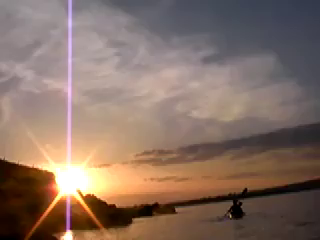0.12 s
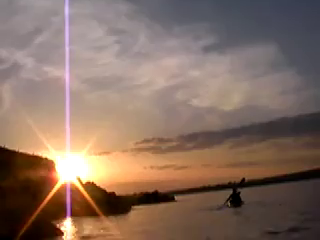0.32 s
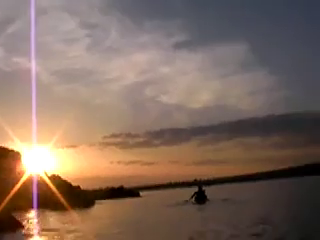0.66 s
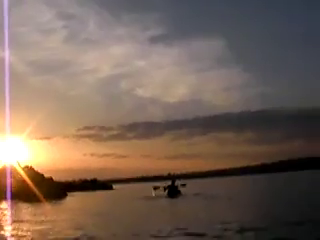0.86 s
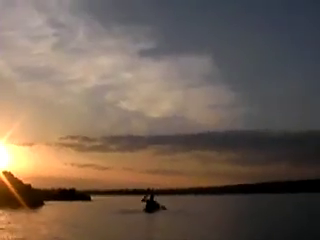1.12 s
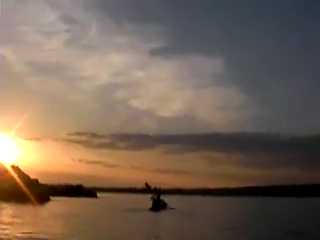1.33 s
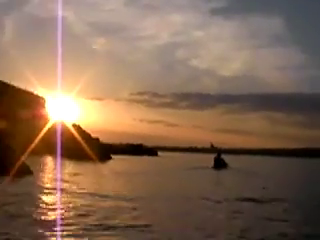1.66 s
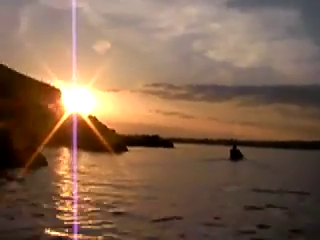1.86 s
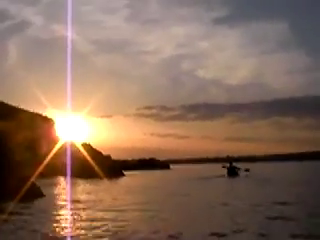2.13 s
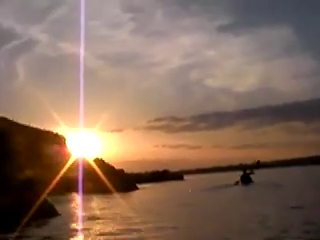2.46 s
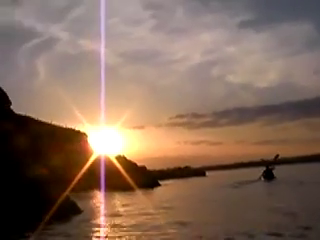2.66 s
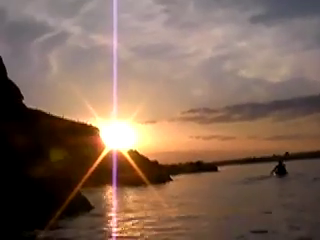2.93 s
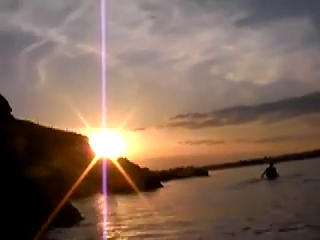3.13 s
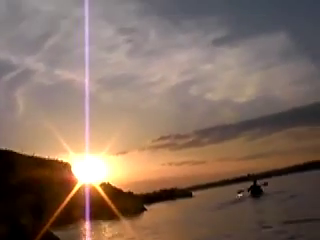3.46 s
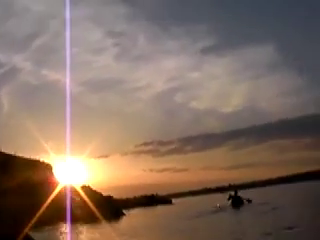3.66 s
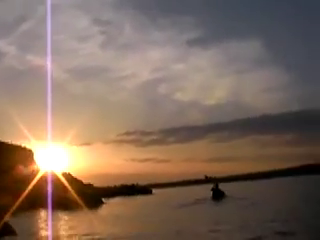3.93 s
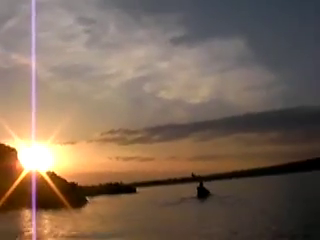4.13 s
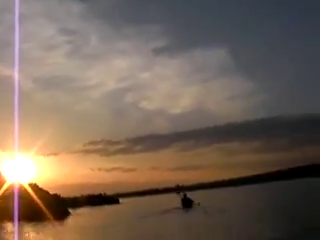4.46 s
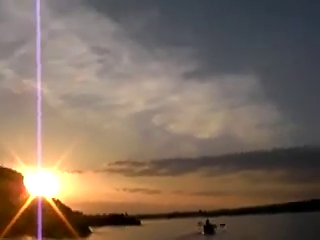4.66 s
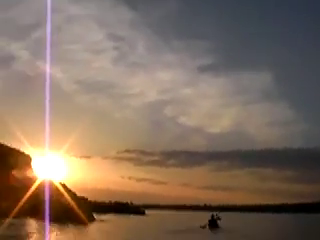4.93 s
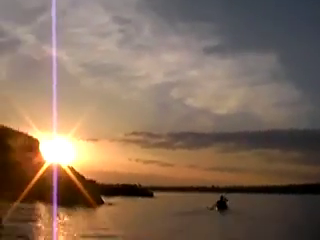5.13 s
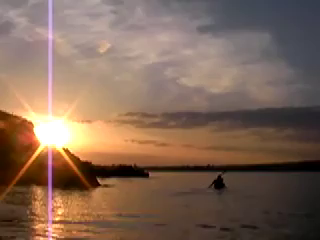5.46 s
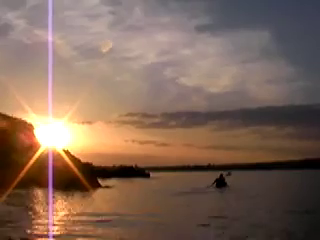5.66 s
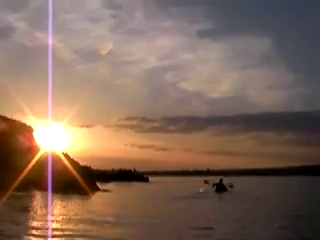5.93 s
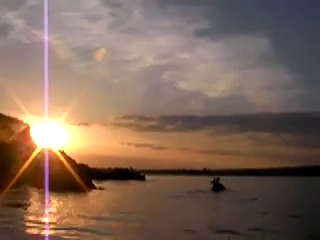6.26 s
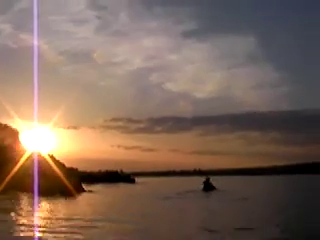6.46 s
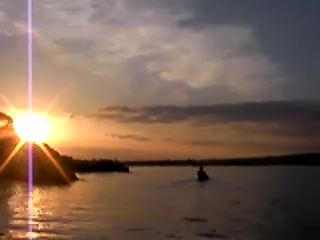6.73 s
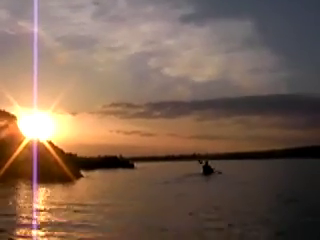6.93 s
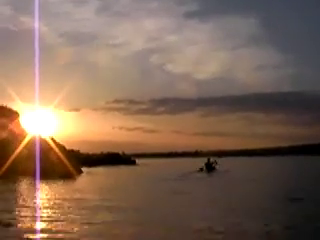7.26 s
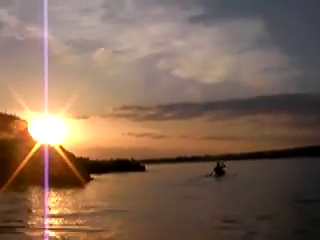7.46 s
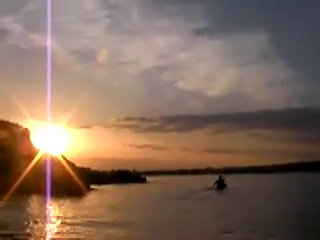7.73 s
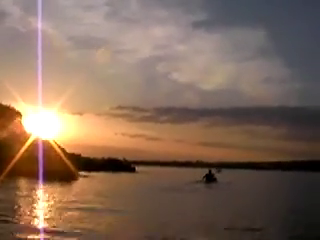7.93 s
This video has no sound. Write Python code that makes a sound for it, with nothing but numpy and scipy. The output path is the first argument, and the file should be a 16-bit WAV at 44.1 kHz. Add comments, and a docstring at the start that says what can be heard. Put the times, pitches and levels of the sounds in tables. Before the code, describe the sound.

Close watery trickle and fizz around a paddled kayak on calm water, small splashes, bright drips, and one hard hollow hull knock near seven seconds.

```python
"""On calm water a kayak glides along, heard from its deck through a small camera with two close microphones.
Paddle strokes stir a wash of filtered noise and gliding bubble tones, and small splashes flare out of it.
Near bubbles and drips are short decaying sines; wavelets lapping at the hull and falling drops are puffs
of noise. Once something hard knocks on the hollow hull, which rings in damped modes, booms and thuds."""
import sys
import numpy as np
from scipy import signal
from scipy.fft import rfft, irfft
from scipy.io import wavfile
from scipy.ndimage import uniform_filter1d

SR = 44100
rng = np.random.default_rng(int(sys.argv[2]) if len(sys.argv) > 2 else 0)


def digitize_waveform(pressure):
    """Quantize a signal to 16-bit integers and store it at the path in sys.argv[1].

    Rows of a 2-D input are taken as channels; values are limited to [-1, 1].
    """
    field = np.atleast_2d(pressure).T
    bounded = np.clip(field, -1, 1)
    quanta = np.round(bounded * 32767).astype(np.int16)
    wavfile.write(sys.argv[1], SR, quanta)


N = 356328
TIME = np.arange(N) / SR


def amp(db):
    """Logarithmic level: converts decibels to an amplitude gain."""
    return 10 ** (np.asarray(db) / 20)


def unit(x):
    """Normalization: scales a signal to rms 1."""
    return x / np.sqrt(np.mean(x ** 2) + 1e-20)


def read(points, hz):
    """Spectral interpolation: reads a table on a log-frequency axis."""
    f, value = np.transpose(points)
    return np.interp(np.log(hz + 1), np.log(f + 1), value)


def add(mix, s, sound):
    """Superposition: mixes a sound in at time s."""
    part = mix[:, max(round(s * SR), 0):][:, :sound.shape[-1]]
    part += sound[..., :part.shape[1]]


def colour(x, gain):
    """Linear filtering: multiplies the spectrum by a gain given as a function of frequency."""
    size = x.shape[-1]
    return irfft(rfft(x) * gain(np.fft.rfftfreq(size, 1 / SR)), size)


def swell(u):
    """Amplitude envelope: a quick rise and rounded fall as u runs from 0 to 1."""
    return np.sin(np.pi * np.clip(u, 0, 1) ** .6)


def arrival(size, lag):
    """Time difference of arrival: clocks in s, the left one lag late (negative lag: the right one)."""
    return np.arange(size) / SR - np.array([[lag / 2], [-lag / 2]]) - abs(lag) / 2


# Likeness of the two microphones in diffuse sound. Each row: frequency in Hz, coherence.
COHERENCE = [(40, 0.25), (150, 0.62), (350, 0.86), (1300, 1), (2200, 0.76), (3200, 0.42), (5000, -0.055),
             (7000, 0.061), (15000, 0.083)]
LEFT_SHARE = 0.22  # part of the diffuse noise power that comes from the left
LEFT_LEAD_S = 5.8e-5  # its lead at the left microphone


def diffuse(size):
    """Spatial coherence: white noise most alike near 1300 Hz, less so in the deep bass, mostly unrelated
    in the treble, with a part from the left."""
    mid, side, left = rng.standard_normal((3, size))
    mid = colour(mid, lambda f: np.sqrt((1 + read(COHERENCE, f)) / 2))
    side = colour(side, lambda f: np.sqrt((1 - read(COHERENCE, f)) / 2))
    late = colour(left, lambda f: np.exp(-2j * np.pi * f * LEFT_LEAD_S))
    around = np.sqrt(1 - LEFT_SHARE) * np.array([mid + side, mid - side])
    return around + np.sqrt(LEFT_SHARE) * np.array([left, late])


def bubble(hz, glide, length, lag):
    """Bubble resonance: a pocket of air rings while its pitch slides by glide octaves over its length in s."""
    t = arrival(int(length * SR) + 16, lag)
    u = t / length
    rate = np.log(2) * glide + 1e-6
    # the integral of an exponential pitch glide
    cycles = hz * length * np.expm1(rate * u) / rate
    return swell(u) * np.sin(2 * np.pi * cycles)


# Slow rise and fall of the stirred water.
# Each row: time in seconds, base gurgle level in dB, base spray level in dB.
STIR_LEVELS = [(0.0, -53, -53), (0.36, -54.5, -51), (0.81, -49, -45.5), (1.22, -44, -50.5),
               (1.57, -52, -51), (1.89, -52, -51), (2.48, -46.5, -47.5), (2.86, -48, -51), (3.31, -46, -51),
               (3.8, -50, -48), (4.3, -50.5, -52), (4.84, -46.5, -45.5), (5.29, -50, -50.5),
               (5.69, -50.5, -50.5), (6.05, -49, -47.5), (6.93, -50, -51), (7.63, -53.5, -49),
               (8.08, -47.5, -47.5)]
# Small splashes flare and sink back.
# Each row: start in seconds, length in seconds, extra gurgle in dB, extra spray in dB.
SPLASH_FLARES = [(0.362, 0.088, 5, 0), (0.42, 0.13, 2.5, 3.5), (0.577, 0.14, 2.5, 1), (1.068, 0.11, -1, 6),
                 (1.164, 0.12, -2, 9), (1.269, 0.19, -1, 6), (2.225, 0.18, 1.5, 1),
                 (2.755, 0.17, 3.5, -2.5), (3.185, 0.42, 0.5, 4), (3.85, 0.26, 3.5, 2),
                 (4.4, 0.046, 9, 7.5), (4.465, 0.07, 1, 8), (4.654, 0.2, -1.5, 3.5),
                 (4.888, 0.11, 0.5, 2.5), (5.183, 0.071, 0, 6), (5.394, 0.18, 3, 1), (5.99, 0.051, 3.5, 3),
                 (6.338, 0.16, 1.5, -0.5), (6.501, 0.1, 4.5, 6.5), (7.413, 0.1, 6.5, 3.5),
                 (7.612, 0.26, 1.5, 4)]


def stir():
    """Level modulation: gurgle and spray follow the slow stir, and each splash flares above it (in dB)."""
    s, gurgle_db, spray_db = np.transpose(STIR_LEVELS)
    slow_db = np.array([np.interp(TIME, s, gurgle_db), np.interp(TIME, s, spray_db)])
    splash_db = 0
    for start, length, *extra_db in SPLASH_FLARES:
        splash_db = splash_db + np.outer(extra_db, swell((TIME - start) / length))
    return slow_db + splash_db


# The water churns and frees a cloud of bubbles.
# Each row: start in seconds, end in seconds, churn in dB before its edges are smoothed.
CHURN_SPANS = [(0.712, 1.076, 2.5), (1.073, 1.51, 3.5), (3.106, 3.602, 2), (4.66, 5.0, 0.5),
               (6.012, 6.25, 2), (6.402, 6.705, 1.5)]


def churning():
    """Bubble entrainment: the strength of the churn in dB at every sample."""
    churn_db = np.zeros(N)
    for start, end, db in CHURN_SPANS:
        churn_db += db * ((start < TIME) & (TIME < end))
    return uniform_filter1d(churn_db, size=1300)


def wash(spectrum, patchy_db, flicker_db, size):
    """Incoherent summation: countless far bubbles merge into a noise that comes in patches and flickers."""
    hz, _, z = signal.stft(diffuse(N), SR, nperseg=512, noverlap=384)
    patches = rng.standard_normal(z.shape[1:])
    patches = uniform_filter1d(patches, size, axis=0)  # along frequency
    patches = unit(uniform_filter1d(patches, size=7, axis=1))  # along time
    flicker = unit(uniform_filter1d(rng.standard_normal(z.shape[2]), size=5))
    z = z * amp(read(spectrum, hz)[:, None] + patchy_db * patches + flicker_db * flicker)
    return unit(signal.istft(z, SR, nperseg=512, noverlap=384)[1][:, :N])


def swarm(low_hz, high_hz, per_s, cycles, spread_db, rise, count=60):
    """Random superposition: short gliding tones of many pitches sound at random times all around the boat."""
    out = np.zeros((2, N))
    traits = rng.uniform(-0.877, 1, (count, 3))
    for hz, (life, slide, place) in zip(np.geomspace(low_hz, high_hz, count), traits):
        ring = bubble(hz, rise + 0.812 * slide, cycles * 2 ** life / hz, 0.000078 * place)
        ring *= (hz / high_hz) ** 0.74  # low tones ring longer but more softly
        for when, size in rng.random((300, 2))[:int(per_s * N / SR / count)]:
            add(out, when * N / SR, ring * amp(spread_db * min(-np.log(size + 1e-9), 3)))
    return unit(out)


# Spectrum of the low gurgle. Each row: frequency in Hz, relative density in dB per Hz.
GURGLE_SPECTRUM = [(30, -10.5), (90, -54), (150, 4), (225, -39.5), (310, 1.5), (600, -1), (1100, 2),
                   (1800, 0), (2800, -5), (5000, -18), (14000, -13.5)]
# Spectrum of the high spray. Each row: frequency in Hz, relative density in dB per Hz.
SPRAY_SPECTRUM = [(200, -30), (1000, -13.5), (2500, 2), (4500, 4.5), (5800, 3.5), (6900, 7), (9500, 2),
                  (12500, 6), (16000, -13)]


def water():
    """Bubble acoustics: stirred water gurgles low and fizzes high; single bubbles stand out where it churns."""
    gurgle_db, spray_db = stir()
    churn_db = churning()
    gurgle = amp(-1.5) * wash(GURGLE_SPECTRUM, patchy_db=2.0, flicker_db=0.87, size=5)
    # larger bubbles ring on and slide in pitch: a soft trickle
    trickle = amp(-8.5) * swarm(478, 1898, per_s=150, cycles=17.75, spread_db=0.8, rise=0.321)
    bubbling = amp(-13.5) * swarm(471, 2900, per_s=250, cycles=7.04, spread_db=3.0, rise=0.27)
    spray = amp(1.5) * wash(SPRAY_SPECTRUM, patchy_db=2.0, flicker_db=0.83, size=16)
    fizz = amp(-8.0) * swarm(3150, 13840, per_s=320, cycles=5.6, spread_db=2.5, rise=0.41)
    # now and then a tiny bubble pops at the surface
    crackle = amp(-14.5) * swarm(5050, 12600, per_s=23, cycles=13.0, spread_db=1.5, rise=0)
    # sparse, very faint low tones that start between about 115 and 190 Hz at random times
    low_tones = amp(-31.5) * swarm(116.5, 191.5, per_s=8, cycles=6.4, spread_db=2.5, rise=0)
    # churn lifts the bubbles and lowers the smooth noise
    churn, calm = amp(churn_db), amp(-.45 * churn_db)
    low = calm * gurgle + low_tones + churn * (trickle + bubbling)
    high = calm * spray + churn * (fizz + crackle)
    return low * amp(gurgle_db) + high * amp(spray_db)


def plink(hz, lag, cycles=6.1, sharp=0.057):
    """Damped oscillation: a drip snaps a tiny bubble into ringing, a little sharp at first, and it dies away."""
    t = np.maximum(arrival(1024, lag), 0)
    fade = np.exp(-hz * t / cycles)
    return fade * np.sin(2 * np.pi * (hz * t + sharp * cycles * (1 - fade)))


# Drips that land close by and ring at once.
# Each row: time in seconds, level in dB, settled pitch in Hz.
DRIP_RINGS = [(0.1455, -35, 6600), (0.4428, -31, 5100), (0.455, -32, 4100), (0.4795, -32, 3900),
              (0.6862, -27, 6500), (0.732, -41, 2040), (0.776, -34, 6350), (0.856, -45, 2500),
              (0.8878, -37, 9800), (0.9034, -29, 3620), (0.931, -41, 3200), (0.98, -34.5, 3700),
              (1.06, -35, 4000), (1.172, -30, 6400), (1.3008, -23, 6200), (1.3314, -33, 6350),
              (1.364, -34, 5040), (1.505, -40, 3200), (2.336, -36.5, 3920), (2.484, -34, 6800),
              (2.549, -32, 2040), (2.658, -36, 2000), (2.7436, -30, 9800), (3.437, -44, 1620),
              (3.899, -42, 1550), (3.967, -32, 6350), (3.9955, -36, 2360), (4.183, -42, 2400),
              (4.9047, -32, 6350), (5.455, -39.5, 1600), (5.778, -32, 10000), (6.083, -39, 2200),
              (6.097, -37, 2310), (6.648, -40, 3120), (7.3185, -30.5, 5000), (7.6862, -35.5, 3150),
              (7.9, -28, 6800), (7.9572, -26, 3620), (7.9724, -31, 5400), (7.979, -32, 4400),
              (8.047, -31.5, 4850)]


def drips(lead_s=2e-5):
    """Impulsive bubble excitation: single drips ring beside the boat, a little to the left."""
    out = np.zeros((2, N))
    for s, db, hz in DRIP_RINGS:
        add(out, s, amp(db) * plink(hz, -lead_s))
    return out


def band(size, hz, octaves):
    """Band-limited noise: diffuse noise in a bell around one pitch."""
    noise = diffuse(size)
    return unit(colour(noise, lambda f: np.exp(-.5 * (np.log2((f + 1) / hz) / octaves) ** 2)))


def bursts(rows, level_db, octaves, attack, length):
    """Impact noise: water striking water or hull gives a puff of noise around one pitch that dies at once."""
    out, t = np.zeros((2, N)), np.arange(8192) / SR
    shape = (1 - np.exp(-t / attack)) * np.exp(-2 * t / length)
    for s, db, hz in rows:
        add(out, s, amp(db + level_db) * band(len(t), hz, octaves) * shape / shape.max())
    return out


# The loudest drops striking the surface.
# Each row: time in seconds, relative level in dB, centre of the noise in Hz.
DROP_IMPACTS = [(0.163, -40.5, 7100), (0.589, -42, 6350), (0.619, -47, 4000), (1.0894, -38, 4800),
                (1.189, -40, 5100), (1.3394, -41, 4200), (1.78, -43.5, 6000), (2.5478, -36, 12000),
                (2.5514, -29.5, 11000), (2.5575, -27, 10500), (2.867, -40.5, 9550), (3.2216, -33, 10600),
                (3.281, -38.5, 6100), (3.342, -44.5, 3800), (3.6501, -42.5, 10800), (3.796, -41, 9300),
                (4.253, -40, 12600), (4.3704, -39.5, 6840), (4.401, -31, 9600), (5.202, -36.5, 9800),
                (5.3647, -41.5, 9700), (5.9612, -40, 2600), (6.102, -43, 9850), (6.4961, -39.5, 6990),
                (7.371, -41, 9370), (7.4745, -34, 4460)]


def drops():
    """Impact noise at the surface: drops give very short, mostly bright puffs."""
    return bursts(DROP_IMPACTS, level_db=7.0, octaves=0.88, attack=0.00018, length=0.0053)


# The strongest wavelets lapping at the hull.
# Each row: time in seconds, relative level in dB, centre of the noise in Hz.
HULL_LAPS = [(0.353, -36, 1160), (0.589, -33, 610), (0.621, -33, 493), (1.107, -34, 835),
             (1.207, -33.5, 354), (1.408, -35.5, 1100), (2.29, -29, 940), (2.446, -26, 900),
             (2.547, -26.5, 2250), (2.549, -30.5, 490), (3.218, -30.5, 1600), (3.461, -32, 1450),
             (4.409, -44, 1170), (4.413, -35, 477), (4.898, -32.5, 1310), (5.96, -31, 1500),
             (6.423, -33.5, 1890), (6.633, -33, 1160)]


def laps():
    """Impact noise at the hull: wavelets give longer, lower puffs."""
    return bursts(HULL_LAPS, level_db=-10.0, octaves=0.76, attack=0.00035, length=0.038)


# Showers of fine droplets fall back.
# Each row: start in seconds, length in seconds, upper limit of droplet level in dB.
DROPLET_SHOWERS = [(0.432, 0.06, -38), (1.09, 0.049, -36.5), (1.177, 0.05, -31), (1.279, 0.084, -35),
                   (4.48, 0.043, -41), (4.758, 0.049, -37), (4.891, 0.05, -35.5), (6.487, 0.06, -44)]


def sprinkle(low_hz=3600, high_hz=8000, per_s=330, spread_db=3.0, count=60):
    """Random superposition: each shower of droplets leaves a loose cluster of tiny ringing bubbles."""
    out = np.zeros((2, N))
    for start, length, db in DROPLET_SHOWERS:
        for when, pitch, loud, place in rng.random((count, 4))[:int(per_s * length)]:
            ring = plink(low_hz * (high_hz / low_hz) ** pitch, 0.0001 * (place - .5), cycles=2.3)
            add(out, start + when * length, amp(db - 2 * spread_db * loud) * ring)
    return out


# a stray bubble at RING_HZ rings for RING_S; smaller ones die sooner
RING_S, RING_HZ, RING_SLOPE = 0.015, 990, 1


def stray_bubbles(low_hz=700, high_hz=3000, level_db=-46.0, spread_db=4.0, busy_per_s=60, busy_db=5.0,
                  rise=0.076, count=600):
    """Random arrivals: rows for softer near bubbles, which crowd where the water churns hardest."""
    per_s = busy_per_s * (churning() / busy_db) ** 2
    when, luck, loud, pitch, slide = rng.random((count, 5)).T
    hz = low_hz * (high_hz / low_hz) ** pitch
    length = RING_S * (RING_HZ / hz) ** RING_SLOPE
    db = level_db + spread_db * (2 * loud - 1)
    rows = np.transpose([when * N / SR, db, hz, rise + slide - .5, length])
    # each candidate is kept with a chance set by the rate at its time
    chance = per_s[(when * N).astype(int)] * N / SR / count
    return list(rows[luck < chance])


# The loudest near bubbles.
# Each row: start in seconds, level in dB, starting pitch in Hz, glide in octaves, length in seconds.
BUBBLE_RINGS = [(0.553, -39.5, 1650, -0.56, 0.0034), (0.59, -42, 612, 0.26, 0.034),
                (0.622, -35, 532, -0.13, 0.018), (0.633, -39, 524, 0.041, 0.027),
                (0.616, -48.5, 334, 0.18, 0.046), (0.722, -38.5, 1390, -0.58, 0.0056),
                (0.759, -43, 1140, 0.069, 0.015), (0.7617, -32.5, 1900, 1.1, 0.002),
                (0.796, -43, 1430, -0.044, 0.014), (0.825, -39, 1105, 0.18, 0.014),
                (0.866, -32.5, 1620, 0.23, 0.0053), (0.9041, -20, 6130, -0.4, 0.0014),
                (0.907, -43.5, 520, 0.75, 0.037), (0.937, -36, 1290, -0.068, 0.0085),
                (1.003, -41, 1380, 0.92, 0.011), (1.02, -46, 760, 0.2, 0.028),
                (1.087, -35.5, 442, 1.2, 0.026), (1.096, -32, 643, 1.1, 0.016),
                (1.111, -39, 3020, -0.46, 0.0055), (1.114, -37.5, 800, 0.1, 0.022),
                (1.131, -32.5, 2980, 0.19, 0.0037), (1.17, -37, 2370, -0.066, 0.0072),
                (1.207, -39, 4070, -0.27, 0.0098), (1.208, -40.5, 263, -0.079, 0.024),
                (1.211, -38.5, 447, -0.12, 0.024), (1.239, -47, 292, 0.63, 0.022),
                (1.283, -37, 1490, 0.34, 0.0076), (1.287, -45, 810, -0.61, 0.0093),
                (1.311, -35.5, 2560, 0.2, 0.003), (1.329, -39, 1770, -0.18, 0.003),
                (1.347, -43, 4530, -0.52, 0.005), (1.361, -43, 960, -0.018, 0.026),
                (1.408, -41, 1630, -0.47, 0.0046), (1.409, -36, 2870, 0.17, 0.0042),
                (1.472, -44, 1840, 0.089, 0.012), (1.566, -45, 683, -0.077, 0.016),
                (2.236, -31, 2470, 1.5, 0.0015), (2.251, -47, 313, 0.11, 0.035),
                (2.291, -28.5, 1265, -0.5, 0.0094), (2.437, -46, 329, 0.11, 0.043),
                (2.4387, -35.5, 672, -0.25, 0.024), (2.44, -31.5, 1375, 0, 0.014),
                (2.4406, -33.5, 1680, 0.027, 0.017), (2.449, -31.5, 607, 1.1, 0.012),
                (2.451, -40, 1077, -0.25, 0.025), (2.5392, -18, 12500, -0.12, 0.00076),
                (2.5606, -25, 11000, 0.45, 0.0009), (3.222, -42, 826, -0.23, 0.018),
                (3.2399, -35, 1970, 0.13, 0.01), (3.2407, -26.5, 1750, 0.11, 0.0096),
                (3.301, -39, 1255, 1.1, 0.017), (3.342, -48, 788, 0.7, 0.034),
                (3.508, -47, 1386, 0.066, 0.018), (3.564, -47, 607, 0.84, 0.019),
                (3.906, -42, 1057, 0.053, 0.021), (4.412, -33, 2150, -1.8, 0.01),
                (4.4215, -45, 1300, 2.1, 0.006), (4.4794, -34, 1400, -0.23, 0.0029),
                (4.631, -41, 1060, -0.2, 0.0083), (4.898, -43, 1390, 0.14, 0.008),
                (5.661, -44, 1230, 0, 0.022), (5.964, -44, 770, -0.48, 0.028),
                (5.99, -32, 2500, -0.87, 0.0038), (5.991, -38, 610, 0.55, 0.0077),
                (5.9926, -33.5, 1290, -0.19, 0.007), (6.015, -42.5, 313, 1.1, 0.021),
                (6.024, -42, 630, -0.48, 0.021), (6.037, -46.5, 330, 0.11, 0.032),
                (6.06, -45, 1270, 0.14, 0.019), (6.107, -48, 493, -0.49, 0.012),
                (6.13, -45.5, 533, -0.8, 0.031), (6.165, -55, 310, -0.1, 0.04),
                (6.218, -34, 1400, 1.2, 0.0039), (6.232, -47, 400, 0.26, 0.012),
                (6.523, -32.5, 2410, 0.04, 0.0025), (6.554, -47, 446, 0.09, 0.035),
                (6.578, -44, 1690, -0.1, 0.026), (6.642, -42, 890, 0.82, 0.0054),
                (6.682, -47, 838, 0.21, 0.028), (6.853, -43, 790, 0.012, 0.014),
                (7.474, -26, 2200, 1.03, 0.0035), (8.001, -42.5, 1016, -0.26, 0.018),
                (8.052, -44, 680, 0.49, 0.035)]


def near_bubbles(lead_s=2.5e-5):
    """Free bubble oscillation: single plips and bloops beside the boat, a little to the left."""
    out = np.zeros((2, N))
    for s, db, hz, glide, length in BUBBLE_RINGS + stray_bubbles():
        add(out, s, amp(db) * bubble(hz, glide, length, -lead_s))
    return out


def modes(table, t, lead_s, rise_cycles):
    """Modal superposition: sines of a struck body build up and die, and reach the right microphone late."""
    t = np.maximum(t - np.array([[0], [lead_s]]), 0)
    total = 0
    for hz, db, t60 in table:
        build_up = -np.expm1(-hz * t / rise_cycles)
        total = total + amp(db - 60 * t / t60) * build_up * np.sin(2 * np.pi * hz * t)
    return total


# A hard shaft chatters on the hull. Each row: time in seconds, relative level in dB.
SHAFT_CONTACTS = [(6.9893, 3.5), (6.9905, 5.5), (6.992, -14)]
# Modes of the shaft. Each row: frequency in Hz, relative level in dB, decay time t60 in seconds.
SHAFT_MODES = [(1330, -34, 0.024), (2010, -24.5, 0.025), (2660, -21, 0.0036), (3340, -15.5, 0.004),
               (6540, -18, 0.0053), (9100, -21.5, 0.0039)]
# Modes of the hull. Each row: frequency in Hz, relative level in dB, decay time t60 in seconds.
HULL_MODES = [(152, -38.5, 0.25), (170, -44, 0.36), (187, -40, 0.21), (278, -32, 0.21), (303, -28.5, 0.14),
              (356, -30, 0.15), (458, -28.5, 0.11), (575, -16.5, 0.026), (613, -31, 0.13), (868, -45, 0.3),
              (1080, -21.5, 0.032)]
# Boom of the air inside the hull. Each row: frequency in Hz, relative density in dB per Hz.
BOOM_SPECTRUM = [(40, -29), (90, -13), (150, -6), (280, -14), (450, 2), (800, -5.5), (1400, -13),
                 (3000, -12), (12000, -18)]
# Decay of that boom. Each row: frequency in Hz, decay time t60 in seconds.
BOOM_DECAY = [(150, 0.52), (400, 0.19), (900, 0.21), (2000, 0.082), (8000, 0.006)]
# The hull thuds again, softer and lower, as it settles.
# Each row: time in seconds, level in dB before the bass cut, pitch in Hz.
HULL_THUDS = [(7.02, -37, 292), (7.042, -38, 158), (7.063, -38.5, 182)]


def knock(boom_db=-45.5, lead_s=1.2e-5, bass_hz=125, grit_db=-18.5, thud_s=0.02):
    """Impact excitation: the shaft cracks at each contact; the hull rings, booms and thuds as it settles."""
    out, t = np.zeros((2, N)), np.arange(SR // 2) / SR
    for s, db in SHAFT_CONTACTS:
        grit = amp(grit_db) * band(len(t), hz=2750, octaves=2.0) * np.exp(-t / 0.0013)
        add(out, s, amp(db) * (modes(SHAFT_MODES, t, lead_s, rise_cycles=0.22) + grit))
    # long waves reach both microphones alike, so the boom is one signal
    hz, age, z = signal.stft(rng.standard_normal(len(t)), SR, nperseg=512)
    z = z * amp(read(BOOM_SPECTRUM, hz)[:, None] - 60 * age / read(BOOM_DECAY, hz)[:, None])
    boom = signal.istft(z, SR, nperseg=512)[1][:len(t)]
    boom = unit(boom * (1 - np.exp(-t / 0.0011)))
    ringing = modes(HULL_MODES, t, lead_s, rise_cycles=0.31)
    add(out, SHAFT_CONTACTS[1][0], ringing + amp(boom_db) * boom)
    for s, db, hz in HULL_THUDS:
        add(out, s, amp(db) * swell(t / thud_s) * np.sin(2 * np.pi * hz * t))
    # so small a hull radiates little deep bass
    return signal.lfilter(*signal.butter(3, bass_hz, "high", fs=SR), out)


def scene(lowest_hz=255):
    """Superposition of sources: water all around, and the knock."""
    # the largest near air pockets set the lowest pitch of the laps and near bubbles
    near = colour(laps() + near_bubbles(), lambda f: (1 + (lowest_hz / (f + 1)) ** 8) ** -.5)
    return water() + drips() + drops() + near + sprinkle() + knock()


# The camera's response, with a deep notch in the treble. Each row: frequency in Hz, gain in dB.
CAMERA_RESPONSE = [(7200, 0), (7550, -6.5), (7900, -54), (8200, -20.5), (8600, -10.5), (9200, 3),
                   (12600, -2), (13600, -2), (14300, -23), (15500, -40)]
EDGE_HZ = 15800  # upper band limit


def record(dry):
    """Frequency response: the camera's colour, then its band limit."""
    coloured = colour(dry, lambda f: amp(read(CAMERA_RESPONSE, f)))
    low_pass = signal.firwin(511, EDGE_HZ, window=("kaiser", 9), fs=SR)
    return signal.oaconvolve(coloured, low_pass[None], "same")


dry = scene()
out = record(dry)
digitize_waveform(out)
```